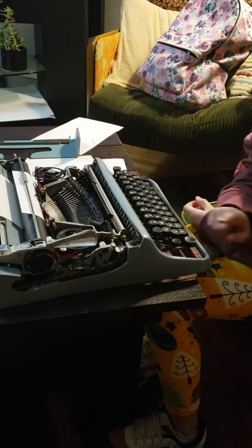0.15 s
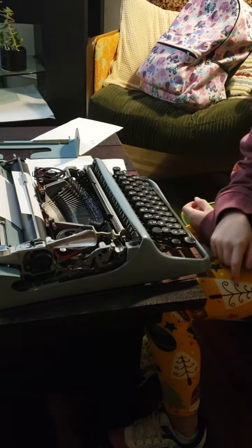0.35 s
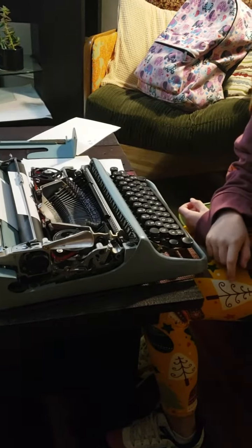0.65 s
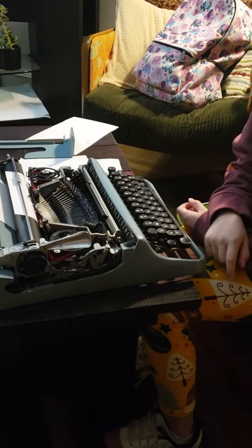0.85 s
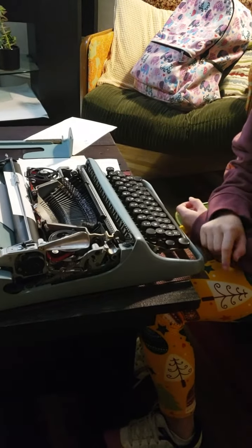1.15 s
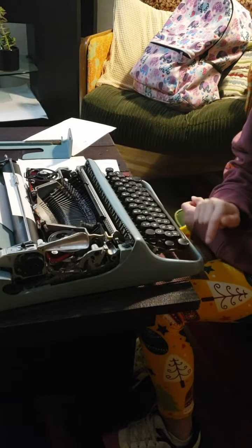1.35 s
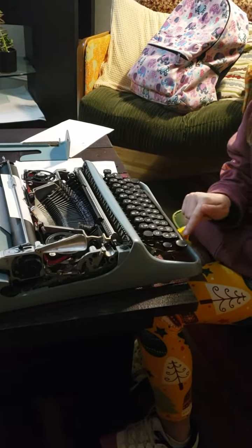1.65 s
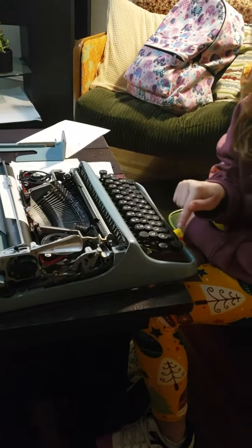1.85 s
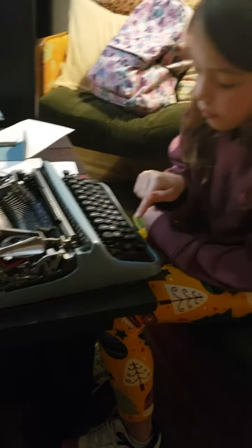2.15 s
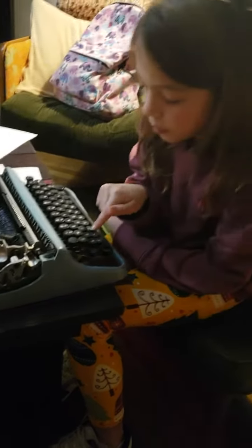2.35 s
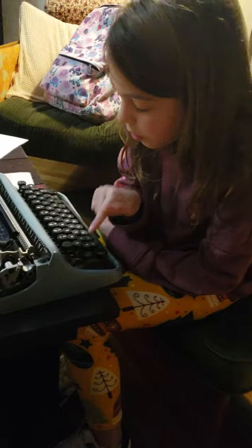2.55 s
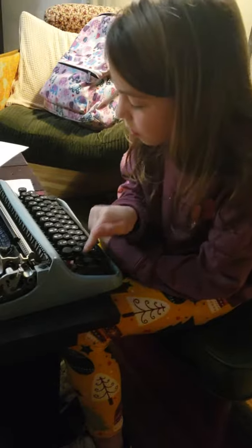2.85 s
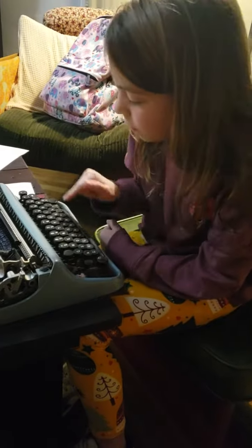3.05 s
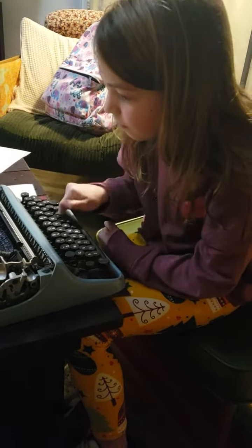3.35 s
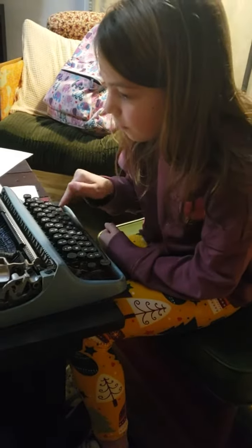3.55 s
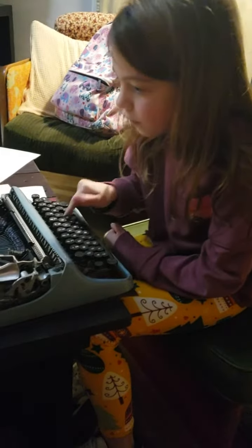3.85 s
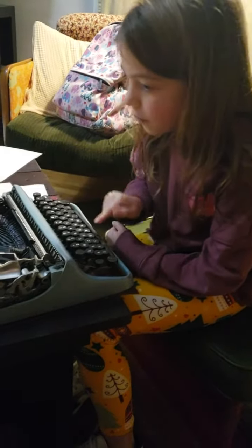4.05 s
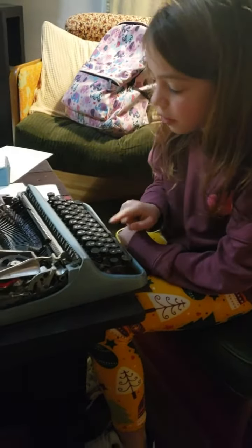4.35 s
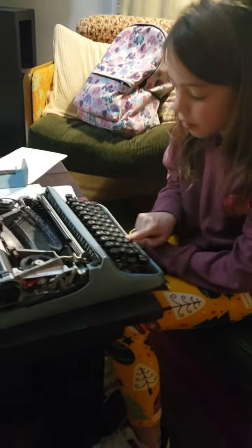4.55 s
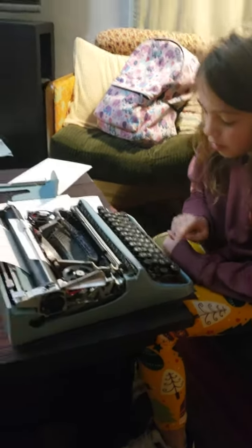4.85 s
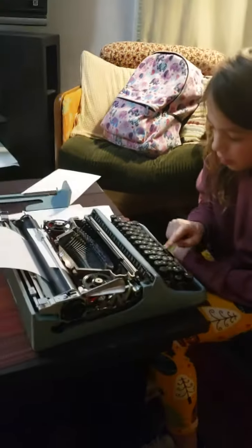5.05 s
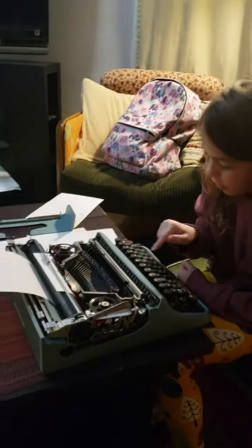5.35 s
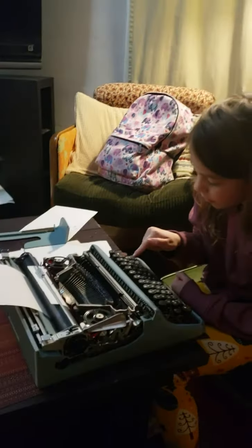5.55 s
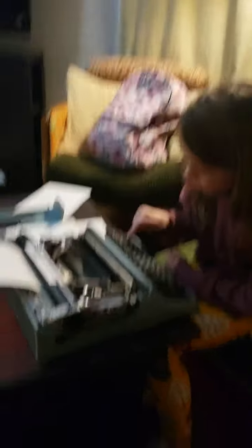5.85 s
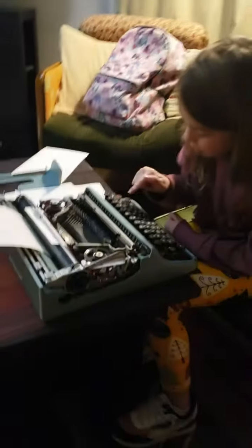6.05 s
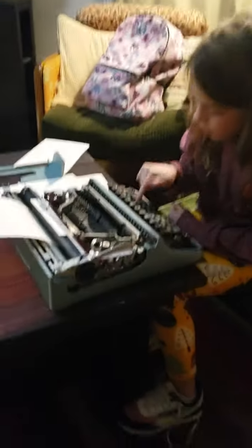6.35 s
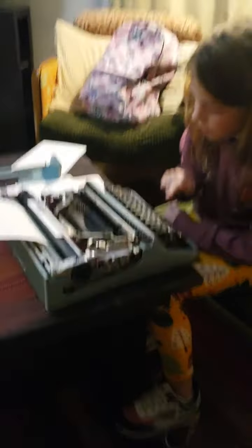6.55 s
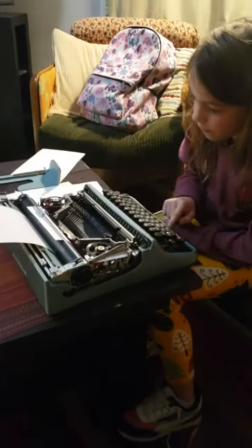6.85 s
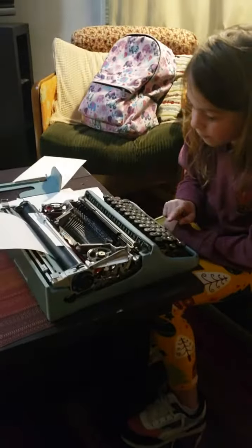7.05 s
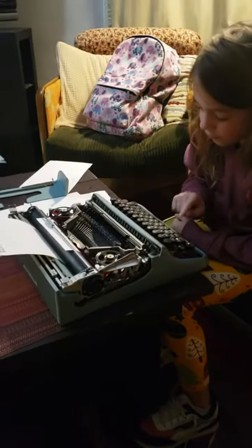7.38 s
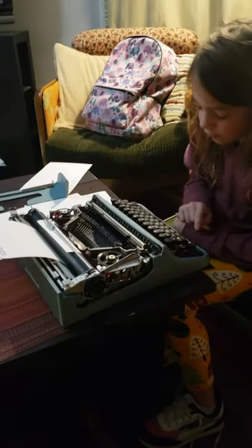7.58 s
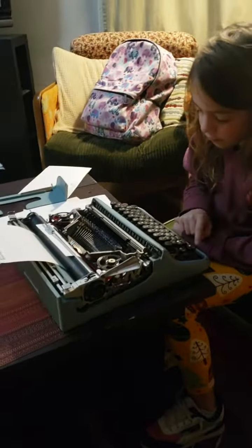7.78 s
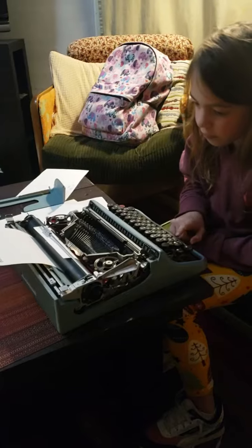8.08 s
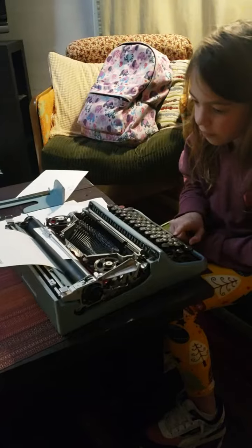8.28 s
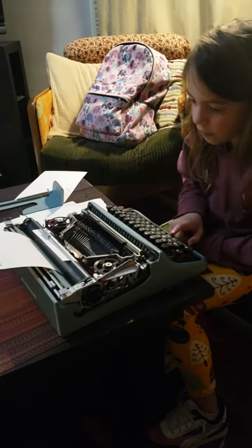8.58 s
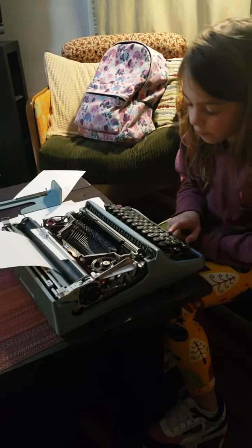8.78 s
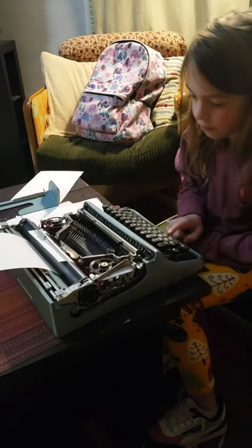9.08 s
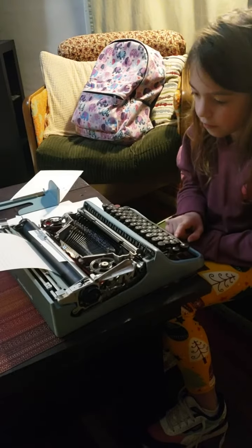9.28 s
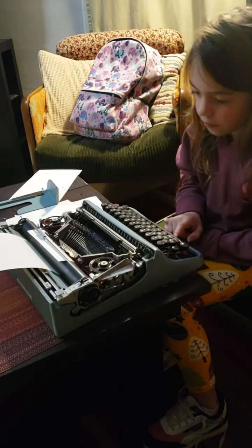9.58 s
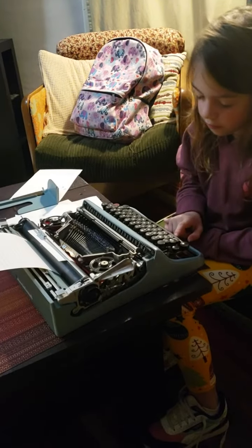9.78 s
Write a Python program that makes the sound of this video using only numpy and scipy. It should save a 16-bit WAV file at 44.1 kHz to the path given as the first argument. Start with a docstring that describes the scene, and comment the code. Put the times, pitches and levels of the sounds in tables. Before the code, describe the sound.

Sparse mechanical typing heard close in a quiet room with short reflections. One key clacks back at the start, near silence follows, then three bright strikes with ticks and rattling levers, each softly thumping the table. Weaker key rattles come later, with a fourth hard strike. The handheld microphone picks up sleeve hiss, rumbling grip shifts, creaky finger slips and hard pops, strongest on the right channel.

```python
"""A key drops back with a rattle and a clack over faint air and hum: a child types slowly with one finger.
The manual typewriter stands on a wooden table in a small room. Four strokes crack against the platen; other
keys only rattle the linkage and fall back, and each one thumps the table. Contacts are coloured noise bursts,
the steel and table are decaying modes, and reflections form the room. The phone is close and hand-held:
stick-slip pulses and grainy noise make the fingers creak and rub on its case beside the right microphone."""
import sys
import numpy as np
from scipy import signal
from scipy.fft import rfft, irfft
from scipy.io import wavfile

SR = 44100
rng = np.random.default_rng(int(sys.argv[2]) if len(sys.argv) > 2 else 0)


def waveform_to_disk(signal):
    """Save audio, clipped to [-1, 1], as 16-bit WAV at the path in sys.argv[1]."""
    frames = np.transpose(np.atleast_2d(signal))
    scaled = np.clip(frames, -1, 1) * 32767
    samples = np.round(scaled).astype(np.int16)
    wavfile.write(sys.argv[1], SR, samples)


N = 437472
TIME = np.arange(N) / SR
# All table levels are relative: each function sets the balance of its layer.


def undb(db):
    """Decibel law: level to amplitude ratio."""
    return 10 ** (np.asarray(db) / 20)


def fade(t, t60):
    """Exponential decay: the level falls by 60 dB in t60 seconds."""
    return np.exp(-np.log(1000) * t / t60)


def unit(x):
    """Normalisation to a root-mean-square value of one."""
    return x / np.sqrt(np.mean(x ** 2))


def add(track, s, sound):
    """Superposition: mixes a sound into a track from time s on."""
    i = int(s * SR)
    sound, i = sound[..., max(-i, 0):], max(i, 0)
    track[..., i:i + sound.shape[-1]] += sound[..., :N - i]


def convolve(x, response):
    """Linear response: every sample of x launches a scaled copy of the response."""
    return signal.oaconvolve(np.atleast_2d(x), np.atleast_2d(response), axes=-1)[:, :x.shape[-1]]


def colour(x, points, keep_power=True, size=2048):
    """Minimum-phase filtering: a causal response through (frequency_hz, level_db) points."""
    hz, db = np.transpose(points)
    bin_hz = np.arange(size // 2 + 1) * SR / size
    gain = undb(np.interp(np.log(bin_hz + 1), np.log(hz), db))
    cepstrum = irfft(np.log(unit(gain) if keep_power else gain))
    # folding the cepstrum forward in time makes the filter causal
    cepstrum[1:size // 2] *= 2
    cepstrum[size // 2 + 1:] = 0
    response = irfft(np.exp(rfft(cepstrum)))
    return convolve(x, response).reshape(x.shape)


def ring(modes, t, scatter_db):
    """Modal superposition: decaying sines; every blow shares its energy among them differently."""
    hz, db, t60 = np.transpose(modes)[:, :, None]
    size = undb(db + scatter_db * rng.standard_normal(hz.shape))
    phase = rng.random(hz.shape)  # in cycles
    waves = size * fade(t, t60) * np.sin(2 * np.pi * (hz * t + phase))
    return waves.sum(0) / np.sqrt(np.sum(size ** 2))


def crack(t60, likeness, rise=0.0078):
    """Impact noise: the burst of one metal contact, partly coherent at the two microphones."""
    t = TIME[:SR // 20]
    noise, likeness = rng.standard_normal((3, len(t))), np.clip(likeness, 0, 1)
    shape = fade(t, t60) * (1 - fade(t, rise))
    burst = (np.sqrt(likeness) * noise[2] + np.sqrt(1 - likeness) * noise[:2]) * shape
    # a slower rise leaves the energy of the burst unchanged
    energy = np.sum(fade(t, t60) ** 2)
    return burst * np.sqrt(energy / np.sum(burst ** 2, axis=1, keepdims=True))


def grains(spread_db, size, count=N):
    """Friction noise: tiny contacts of very unequal strength, each held for size samples."""
    strength = np.clip(rng.standard_normal(count // size + 1), -2, 2)
    force = np.repeat(undb(spread_db * strength), size)[:count]
    return unit(force) * rng.standard_normal((2, count))


# spectrum of the air in the room: frequency_hz, level_db
AIR = [(25, -18.5), (48, -20), (80, -7), (130, -17), (185, -21.5), (320, -25), (420, -37.5), (1000, -44),
       (2500, -47), (8000, -50), (11000, -46.5), (15500, -44)]
# a low hum in the room: pitch_hz, level_db
HUM = [(80.7, -61), (118.4, -72)]


def background():
    """Spatial coherence: faint air whose bass is alike at both microphones, with a wavering hum."""
    mid, left, right = colour(rng.standard_normal((3, N)), AIR, size=8192)
    bass = signal.butter(1, 220, fs=SR)
    sides = np.array([left, right])
    air = signal.lfilter(*bass, mid) + sides - undb(-2) * signal.lfilter(*bass, sides)
    hum = 0
    for hz, db in HUM:
        waver = np.interp(TIME, np.linspace(0, TIME[-1], num=80), rng.standard_normal(80))
        tone = np.sin(2 * np.pi * hz * TIME + 0.37 * waver)
        hum = hum + undb(db + 1.0 * waver) * np.sqrt(2) * tone
    return undb(-61.5) * air + hum * undb([[-2], [1]])


# the hand nudges the phone softly: start_s, level_db
NUDGES = [(4.345, -52), (4.935, -53), (5.035, -51), (5.34, -52.5), (5.579, -54.5), (7.41, -41)]


def nudges():
    """Structure-borne sound: each nudge is a dull, grainy bump in the case, mostly at the right microphone."""
    push, t = np.zeros(N), TIME[:SR // 4]
    for s, db in NUDGES:
        add(push, s, undb(db + 5) * (1 - fade(t, 0.016)) * fade(t, .22))
    bump_colour = [(40, 2), (90, 6.5), (300, -2), (750, -12.5), (1200, -24.5), (3000, -33), (8000, -50)]
    bump = colour(push * grains(spread_db=1.5, size=120), bump_colour)
    return bump * undb([[-12], [0]])


# a fingertip brushes along the case: start_s, length_s, level_db
BRUSHES = [(8.035, 0.1, -65), (8.582, 0.13, -55)]


def finger_brushes():
    """Sliding friction: a light, even slide gives a soft mid-range scrape at the right microphone."""
    contact, t = np.zeros(N), TIME[:SR // 4]
    for s, length, db in BRUSHES:
        add(contact, s, undb(db) * (1 - fade(t, 0.016)) * fade(np.maximum(t - length, 0), 0.081))
    brush_colour = [(100, 11.5), (700, -4), (1100, 2.5), (1800, -3.5), (2300, -21.5), (3200, -19), (5000, -28)]
    scrape = colour(contact * grains(spread_db=2.0, size=120)[0], brush_colour)
    return scrape * undb([[-26], [0]])


# the sleeve slides as the phone moves: time_s, hiss_db, left_minus_right_db, case_rumble_db
SLIDE = [(4.85, -58, -6, -59.5), (4.934, -65.5, -5, -66), (5.118, -66.5, 1.5, -68), (5.162, -56, 5.5, -75),
         (5.236, -58, -2.5, -79), (5.25, -60, -4.5, -72.5), (5.496, -77, -2.5, -67),
         (5.662, -68.5, -3, -67), (5.688, -84.5, -3.5, -73), (5.716, -87, -4, -64.5),
         (5.742, -61.5, -10, -62.5), (5.754, -69, -3, -63.5), (5.846, -65, -3, -70.5),
         (5.948, -49.5, -4, -53), (6.066, -71, -7, -73.5), (6.17, -53.5, -7.5, -60.5)]
# the hand then shifts its grip: same columns
GRIP = [(6.17, -53, -7, -60.5), (6.28, -40, -5, -54), (6.31, -56, -15, -41), (6.398, -65, -48, -39.5),
        (6.44, -72.5, -36, -55), (6.66, -72.5, -13, -61.5), (6.75, -82, -6.5, -83)]
# light movements before the slide and after the grip, one curve each: same columns
TOUCHES = [
    [(4.27, -75, 5.7, -73), (4.314, -98, 4.0, -71), (4.398, -70, 4.4, -61.5), (4.52, -67.5, 8.8, -71.5)],
    [(7.53, -82, -6, -83), (7.58, -63, -7.5, -61), (7.692, -77, -9.5, -67), (7.76, -97, -2, -75)],
]
# spectra of cloth hiss, case rumble and skin scrape: frequency_hz, level_db
HISS_COLOUR = [(300, -24), (1200, -26.5), (2600, -16), (4000, -1.5), (7000, 6.5), (8200, -1.5),
               (10000, -0.5), (12000, 0), (15500, -6.5)]
RUMBLE_COLOUR = [(40, -17.5), (110, -5.5), (200, -0.5), (330, 0.5), (750, -5), (1100, -15.5), (2500, -36),
                 (6000, -61.5)]
SCRAPE_COLOUR = [(500, -21), (1100, -2), (1600, -3), (2300, -4), (3100, 2.5), (4500, -19.5), (9000, -28)]


def rubbing(firm_db=-59):
    """Friction noise: sliding cloth hisses; the case carries a rough rumble to the right microphone."""
    s, *columns = np.vstack([TOUCHES[0], SLIDE, GRIP, TOUCHES[1]]).T
    hiss_db, pan_db, rumble_db = (np.interp(TIME, s, c) for c in columns)
    moving = np.interp(TIME, [s[0] - .03, s[0], s[-1], s[-1] + .03], [0, 1, 1, 0])
    sides_db = np.array([pan_db, -pan_db]) / 2
    hiss = colour(grains(spread_db=1.5, size=90), HISS_COLOUR) * undb(hiss_db + sides_db + [[3.5], [6.5]])
    rough = colour(grains(spread_db=4.5, size=120), RUMBLE_COLOUR)
    # a gentle touch gives only the dull part; a firm one opens up the rest
    dull = signal.sosfilt(signal.butter(2, 330, fs=SR, output="sos"), rough)
    firmness = np.minimum(undb(rumble_db - firm_db), 1)
    rumble = (dull + firmness * (rough - dull)) * undb(rumble_db + [[-12], [9]])
    # sliding and pressing together make the skin scrape in the mid-range
    scrape_db = (hiss_db + rumble_db) / 2 + sides_db - 3.0
    scrape = colour(grains(spread_db=4.0, size=150), SCRAPE_COLOUR) * undb(scrape_db)
    return moving * (hiss + rumble + np.sqrt(firmness) * scrape)


# a fingertip creaks over the case in a run of slips: start_s, length_s, first_gap_s, level_db, build_up_ms
CREAKS = [(6.588, .102, 0.019, -27, 1.63), (6.856, .112, 0.017, -27, 1.52),
          (7.069, .085, 0.036, -32.5, 2.4), (7.183, .05, 0.024, -24, 1.65)]
# each gap of a run is this share of the one before; gaps and levels scatter
QUICKEN, GAP_SCATTER, SLIP_SCATTER_DB = .93, 0.054, 4.5
# the fingertip lets go with a single snap: start_s, level_db, build_up_ms
SNAPS = [(6.819, -31, .8), (7.25, -17.5, .21), (7.648, -37.5, 0.28), (7.681, -33.5, 0.38),
         (8.067, -21, 0.89), (8.084, -15.5, 0.48), (8.322, -24, 1.73), (8.342, -18, .76),
         (8.423, -14.5, 0.18), (8.444, -14.5, 0.13), (8.839, -33.5, 4.6)]
# a softer slip gives warning of each snap
WARNING_S, WARNING_DB, WARNING_BUILD_MS = 0.01002, -13, 2


def stick_slip(count=12):
    """Stick-slip friction: quickening runs, and snaps after a softer slip (start_s, level_db, build_up_ms)."""
    slips = []
    for start, length, gap, db, build_ms in CREAKS:
        s = start
        for early, strong in rng.standard_normal((count, 2)):
            if s < start + length:
                slips.append((s, db + SLIP_SCATTER_DB * strong, build_ms))
            s += gap * (1 + GAP_SCATTER * early)
            gap *= QUICKEN
    for s, db, build_ms in SNAPS:
        slips.append((s - WARNING_S, db + WARNING_DB, WARNING_BUILD_MS))
        slips.append((s, db, build_ms))
    return slips


# the phone case crackles under a slipping finger: frequency_hz, level_db
CASE_COLOUR = [(1000, -27), (2300, -5), (3000, 2.5), (4200, -7.5), (7500, -28), (9800, 4), (15000, -10)]


def finger_slips(release_ms=0.29, softness=0.15, cut_hz=115, quality=1.53):
    """Relaxation: fingertip pressure builds and drops at once; the right microphone's bass cut swings after it."""
    push, crackle = np.zeros((2, N))
    lead = SR // 100
    ms = 1000 * (TIME[:2 * lead] - TIME[lead])
    for s, db, build_ms in stick_slip():
        pulse = np.exp(-np.abs(ms) / np.where(ms < 0, build_ms, release_ms))
        # a slow slip involves more flesh, which rounds its edge
        flesh = np.exp(-.5 * (ms / (softness * build_ms)) ** 2)
        add(push, s - TIME[lead], undb(db) * np.convolve(pulse, flesh / flesh.sum(), "same"))
        add(crackle, s, undb(db - 29.5) * crack(t60=0.011, likeness=0.33)[0])
    # resonant second-order bass cut
    w = 2 * np.pi * cut_hz
    thud = signal.lfilter(*signal.bilinear([1, 0, 0], [1, w / quality, w * w], SR), push)
    return (thud + colour(crackle, CASE_COLOUR)) * undb([[-36], [0]])


# modes of typebars and springs: pitch_hz, level_db, t60_s
STEEL = [(2299, -16.5, 0.33), (3550, -9, 0.23), (4150, -10.5, 0.31), (4743, -10, 0.32), (5740, -6.5, 0.2),
         (5200, -10.5, 0.27), (5700, -5.5, 0.25), (6550, -8.5, 0.26), (6848, 2, 0.15), (7030, -5.5, 0.23),
         (7060, -8, 0.21), (8323, -17.5, 0.22), (8419, -12.5, 0.14), (9000, -1, 0.1), (9464, -7, 0.23),
         (9835, -9.5, 0.17), (10700, -14.5, 0.18), (11300, -9, 0.22), (11510, -15.5, 0.33),
         (12240, -10, 0.18), (12540, -14.5, 0.22), (12830, -12, 0.23), (13250, -4, 0.15), (13990, -5, 0.1)]
# first reflections from ceiling and walls: delay_s, left_db, right_db
ECHOES = [(.0099, -10, -21), (0.0134, -7, -19), (0.0172, -16, -18)]


def room(x, size=14000):
    """Reverberation: the steel rings on; a few hard reflections, many scattered ones and a short tail follow."""
    t = TIME[:int(.45 * SR)]
    late_colour = [(200, 7), (1500, 2.5), (7000, 2.5), (15000, -10.5)]
    late = colour(rng.standard_normal((2, len(t))), late_colour) * fade(t, 0.33)
    steel = np.array([ring(STEEL, t, scatter_db=3.5) for _ in range(2)])
    response = (undb(-39.5) * late + undb(-48.0) * steel) * undb([[0], [-2.5]])
    for s, left_db, right_db in ECHOES:
        response[:, int(s * SR)] += undb([left_db, right_db])
    out = convolve(x, response)
    # the scattered reflections are drawn afresh for every block, so no fixed pitch stands out
    t = t[:size]
    shape = undb([[-27], [-29.5]]) * fade(t, 0.19) * (1 - fade(t, 0.11))
    for i in range(0, N, size):
        scatter = shape * grains(spread_db=5.5, size=16, count=size)
        add(out, i / SR, signal.fftconvolve(x[:, i:i + size], scatter, axes=-1))
    # cushions and curtains swallow the top
    return colour(out, [(7000, 0), (11000, 0.0), (15500, -1.5)], keep_power=False)


# modes of the table top under the machine: pitch_hz, level_db, t60_s
TABLE = [(99.5, -2, 0.22), (123.3, 2, 0.25), (142.55, -1, 0.27), (196.5, -7.5, 0.34), (223.2, -5.5, 0.28),
         (266.9, -12, 0.34), (332, -16.5, 0.4), (443, -17.5, 0.27)]


def table(thumps):
    """Modal excitation: rubber feet pass each stroke softly into the table top; the casing adds a dull knock."""
    boom, knock = np.zeros((2, N)), np.zeros(N)
    t = TIME[:SR // 4]
    for s, db in thumps:
        both, apart = (ring(TABLE, t, scatter_db=1.0) * (1 - fade(t, 0.025)) for _ in range(2))
        add(boom, s, undb(db + 9.5) * (both + undb(-18.5) * apart * [[1], [-1]]))
        add(knock, s, undb(db - 5.5) * fade(t, 0.3) * (1 - fade(t, 0.0081)))
    casing_colour = [(60, -23.5), (150, -0.5), (280, 2), (500, -12.0), (900, -17.5), (2000, -33.5), (5000, -53)]
    casing = colour(knock * rng.standard_normal((2, N)), casing_colour)
    return (boom + casing) * undb([[-.7], [1.3]])


# spectra of the ticks and of the loose linkage: frequency_hz, level_db
TICK_COLOUR = [(200, -9), (1400, -9.5), (2800, -7), (3500, -4.5), (7000, 1.5), (8200, -4.5), (10500, -3.5),
               (13500, -1.5), (15500, -5)]
LINK_COLOUR = [(150, -2), (700, -5), (1400, -1.5), (2800, -5.5), (3500, 3.5), (5000, 0), (7100, 4),
               (8200, -6), (9800, -2.5), (11500, -5), (13500, -2.5), (15500, -8)]


def linkage(contacts, rattles):
    """Impact and chatter: sharp ticks and loose rattles of the key levers and typebars."""
    ticks, shake = np.zeros((2, N)), np.zeros(N)
    for s, db in contacts:
        add(ticks, s, undb(db - 5.0) * crack(t60=0.013, likeness=0.087))
    t = TIME[:SR // 8]
    for s, length, db in rattles:
        add(shake, s, undb(db - 1.0) * fade(np.maximum(t - length, 0), 0.02))
    loose = colour(shake * grains(spread_db=3.5, size=48), LINK_COLOUR)
    return colour(ticks, TICK_COLOUR) + loose


# a timid press stops short of the platen: start_s, touch_rattle_db, bottom_rattle_db, thump_db
PRESSES = [(-.045, -43, -34.5, -43.5), (4.568, -35, -35, -40), (7.221, -46, -44, -49.5),
           (8.945, -42.5, -38, -42.5)]
# a press reaches the bottom after PRESS_S, each jolt rattles for JOLT_S, and the table follows TABLE_LAG_S later
PRESS_S, JOLT_S, TABLE_LAG_S = .035, .021, .012
# a key is let go, the escapement ticks and the typebar lands:
# landing_s, fall_s, escapement_db, landing_db, rattle_db, thump_db
RELEASES = [(0.1596, .0405, -31.5, -16.5, -31.5, -40), (2.9304, .0266, -27.5, -15, -36, -42),
            (3.5441, .0255, -19.5, -14, -39, -49.5), (3.9542, .0376, -28, -11.5, -41, -49),
            (4.7672, .042, -25, -26, -33, -45), (6.4465, .031, -24, -18.5, -35, -47.5),
            (7.351, .0295, -38, -25, -36.5, -44.5), (9.1865, .043, -30, -28, -35.5, -46)]
# the finger eases off the key, with a faint tick, before the escapement lets go
EASE_S, EASE_DB = 0.03, -10.5
# the falling typebar brushes its neighbours just before it lands; the machine rocks back afterwards
BRUSH_S, ROCK_S, ROCK_DB = .012, 0.057, -10.5
# a lever or spring snaps into place between strokes: start_s, level_db
LEVER_TICKS = [(2.9816, -17.5), (3.466, -20.5), (3.6337, -29), (3.8601, -32.5), (4.0438, -28),
               (4.8257, -35), (6.361, -16.5)]
# the typebar gathers speed just before the hit and rebounds just after it
SWING_S, SWING_DB, REBOUND_S, REBOUND_DB = 0.0099, 5.5, .042, -23.5
HOLD_S = 0.081  # the held key starts to tremble this long after the hit, and for as long
# a firm stroke throws a typebar against the platen: hit_s, level_db, key_travel_before_s, rattle_db, thump_db
STRIKES = [(2.6759, -13, 0.036, -44.5, -40), (3.3327, -11, 0.029, -45, -45),
           (3.715, -17, 0.04, -48.5, -46.5), (6.221, -10.5, 0.027, -41.5, -42.5)]


def key_action(start_db=-9, rebound_thump_db=-1, falling_db=-11, lift_db=-5, brush_db=-10, held_db=-39):
    """Kinematic chain: each key movement sets off ticks (s, dB), rattles (s, length s, dB) and thumps (s, dB)."""
    ticks, rattles, thumps = list(LEVER_TICKS), [], []
    for s, db, travel, rattle_db, thump_db in STRIKES:
        rattles.append((s - travel, travel, rattle_db))
        rattles.append((s - SWING_S, SWING_S, rattle_db + SWING_DB))
        rattles.append((s + REBOUND_S - TABLE_LAG_S, JOLT_S, db + REBOUND_DB))
        # the linkage keeps trembling while the key is held down
        rattles.append((s + HOLD_S, HOLD_S, db + held_db))
        thumps.append((s - travel, thump_db + start_db))
        thumps.append((s, thump_db))
        thumps.append((s + REBOUND_S, thump_db + rebound_thump_db))
    for s, touch_db, bottom_db, thump_db in PRESSES:
        for jolt, db in ((s, touch_db), (s + PRESS_S, bottom_db)):
            rattles.append((jolt, JOLT_S, db))
            thumps.append((jolt + TABLE_LAG_S, thump_db))
    for s, fall, escapement_db, landing_db, rattle_db, thump_db in RELEASES:
        let_go = s - fall
        ticks += [(let_go - EASE_S, escapement_db + EASE_DB), (let_go, escapement_db)]
        ticks += [(s - BRUSH_S, landing_db + brush_db), (s, landing_db)]
        rattles.append((let_go, fall - BRUSH_S, rattle_db + falling_db))
        rattles.append((s - BRUSH_S, JOLT_S, rattle_db))
        thumps += [(let_go, thump_db + lift_db), (s, thump_db), (s + ROCK_S, thump_db + ROCK_DB)]
    # a barely audible rattle lies under each lever tick
    rattles += [(s, JOLT_S, db - 33) for s, db in LEVER_TICKS]
    return ticks, rattles, thumps


# ring of the struck type slug and its guide: pitch_hz, level_db, t60_s
SLUG = [(9100, -4.5, 0.02), (9520, -1.5, 0.026), (13050, -13.5, 0.038), (13300, -8.5, 0.0093)]
# spectrum of the guide scrape and platen crack: frequency_hz, level_db
STRIKE_COLOUR = [(150, -17), (700, -17), (1200, -10.5), (1700, -10), (2800, -9.5), (3500, 1), (4600, -2.5),
                 (5500, 2.5), (7100, 6.5), (8100, -4.5), (9400, -2.5), (13000, -3.5), (15500, -8)]


def strikes():
    """Impact excitation: the typebar scrapes its guide, cracks on the platen and rings, mostly to the right."""
    blows, slug = np.zeros((2, 2, N))
    t, lead = TIME[:SR // 20], .007
    for s, db, *_ in STRIKES:
        # scrape through the guide, then the crack
        add(blows, s - lead, undb(db - 21.5) * crack(t60=0.11, likeness=.3, rise=0.027))
        add(blows, s, undb(db + 6.5) * crack(t60=0.008, likeness=0.51, rise=0.0033))
        for channel, side_db in enumerate((-6, 7)):
            ringing = ring(SLUG, t, scatter_db=0.5) * (1 - fade(t, 0.002))
            add(slug[channel], s, undb(db + side_db) * ringing)
    return colour(blows, STRIKE_COLOUR), slug


# response of the right microphone's narrow port: frequency_hz, gain_db
RIGHT_PORT = [(150, 5.5), (900, -4.5), (2500, -1.5), (3300, -7.5), (4500, -5), (6200, -15.5), (7000, -11.5),
              (7550, -21), (8400, -7.5), (9300, 3.5), (11000, 0.5), (15500, 1)]


def scene():
    """Superposition: direct machine sound, its room response, the table, the hand and the background."""
    blows, slug = strikes()
    ticks, rattles, thumps = key_action()
    levers = linkage(ticks, rattles)
    # the platen throws its crack upwards, so the room gets more of it
    machine = blows + levers + room(undb(5.0) * blows + undb(-0.5) * levers)
    left, right = machine + rubbing()
    # the right microphone faces away and listens through a narrow port
    heard = np.array([left, colour(right, RIGHT_PORT, keep_power=False)])
    hand = finger_slips() + nudges() + finger_brushes()
    return heard + slug + table(thumps) + hand + background()


def record(dry):
    """Saturation and band limiting: the phone rounds the highest peaks and cuts the top."""
    top_hz = 15900
    low_pass = signal.ellip(10, .2, 70, top_hz, fs=SR, output="sos")
    return signal.sosfilt(low_pass, np.tanh(dry))


dry = scene()
out = record(dry)
waveform_to_disk(out)
```